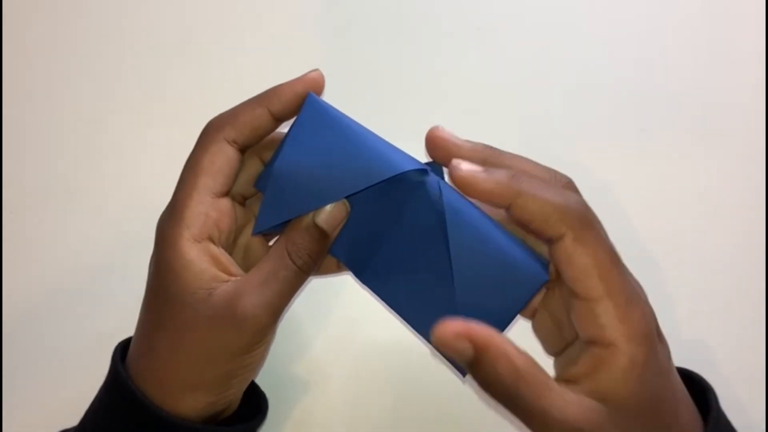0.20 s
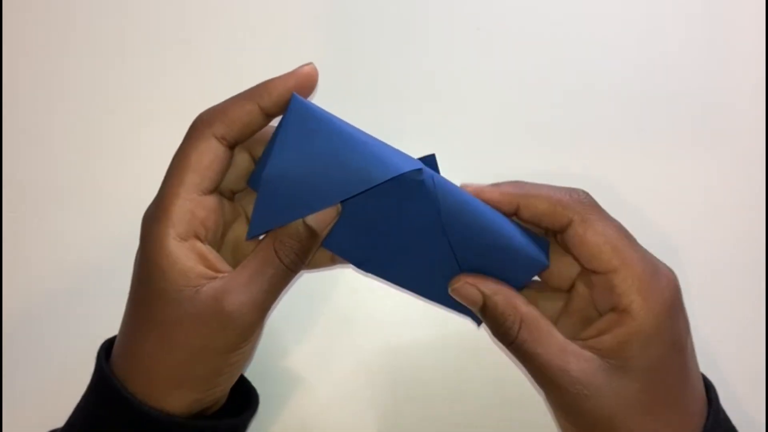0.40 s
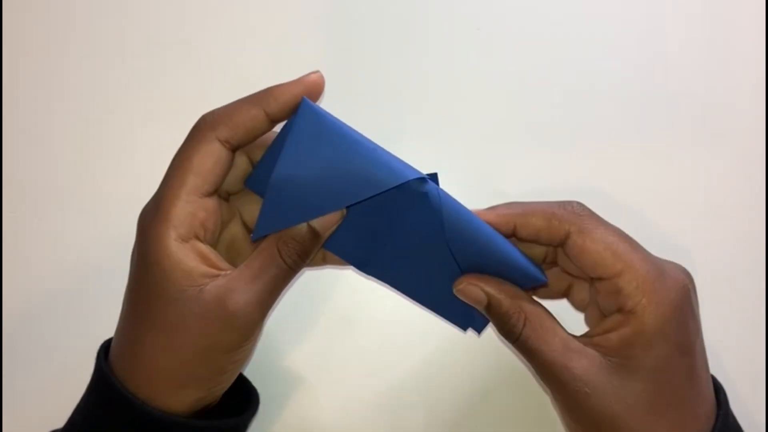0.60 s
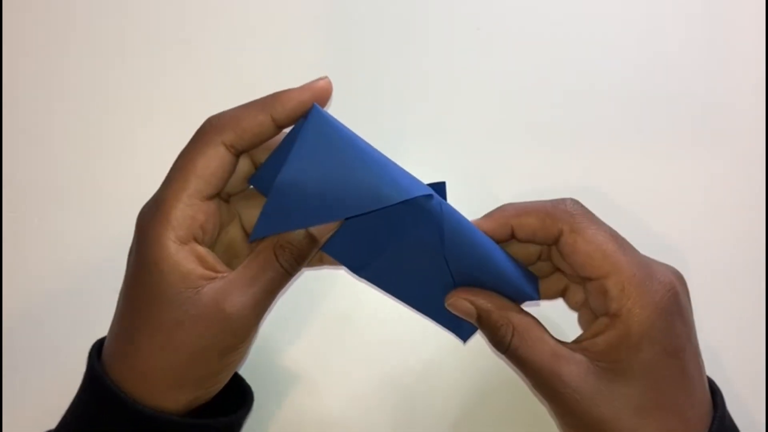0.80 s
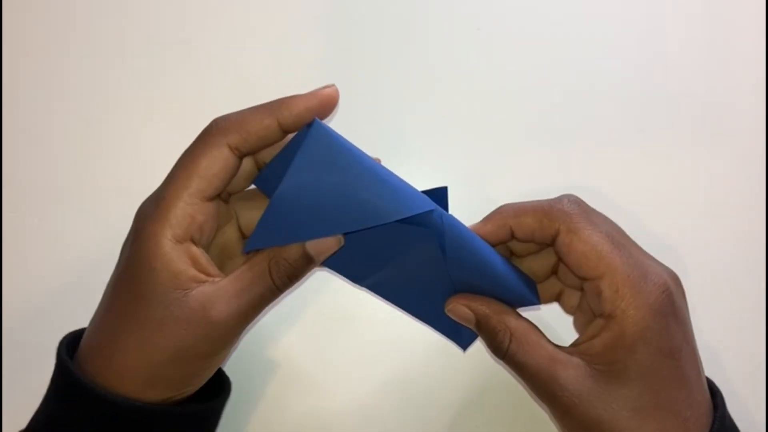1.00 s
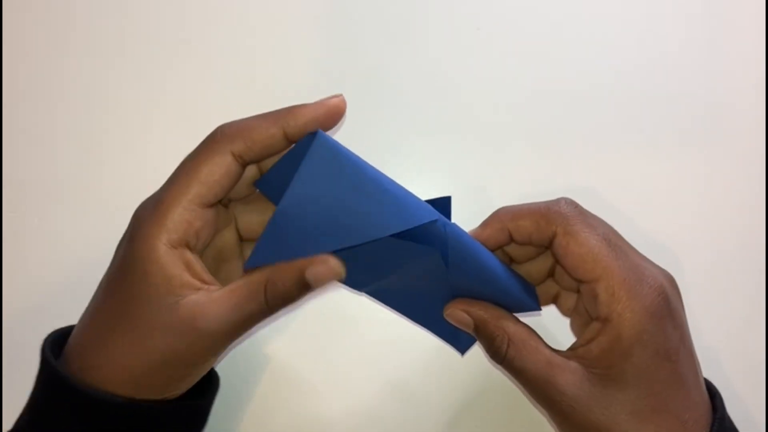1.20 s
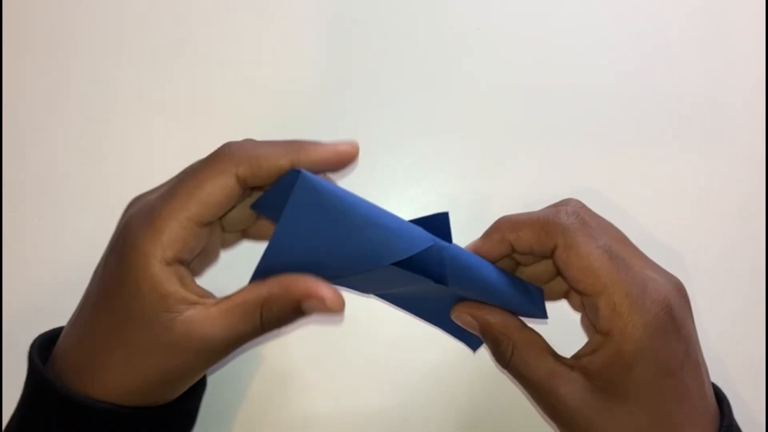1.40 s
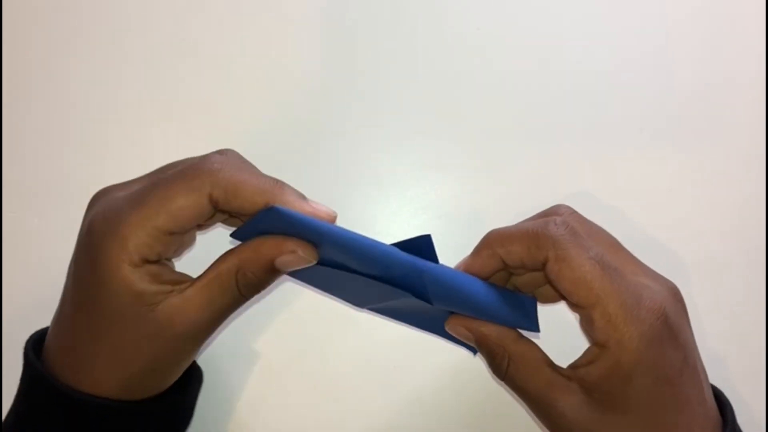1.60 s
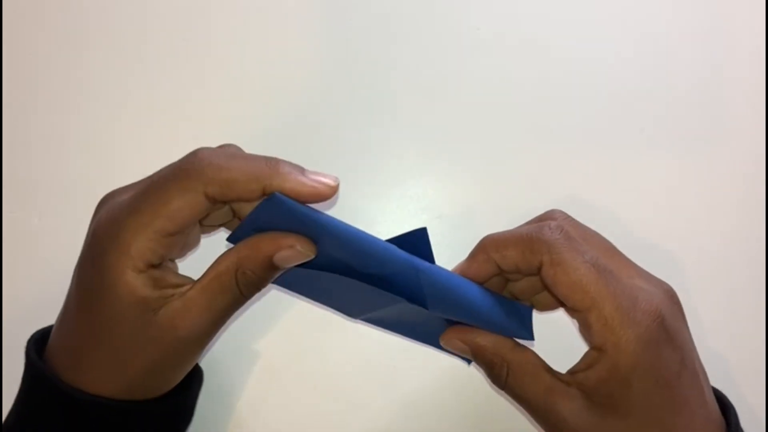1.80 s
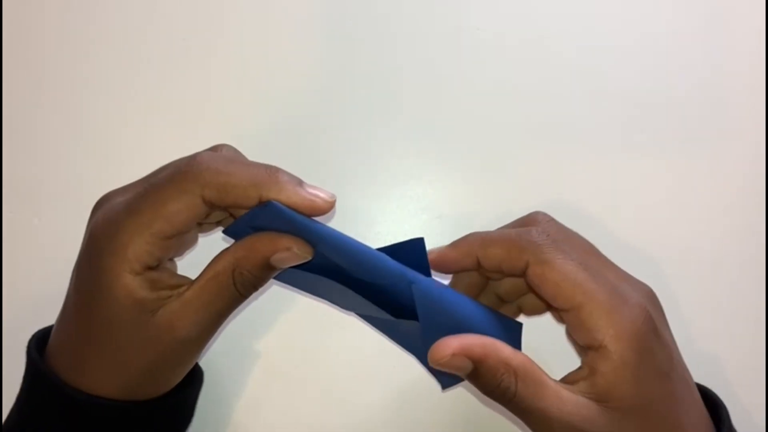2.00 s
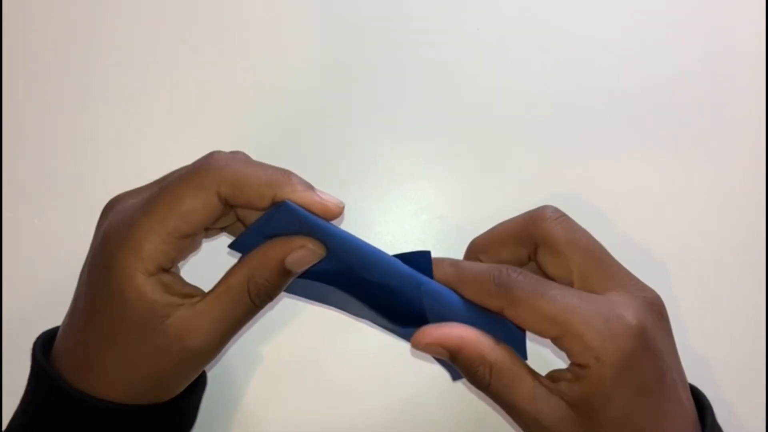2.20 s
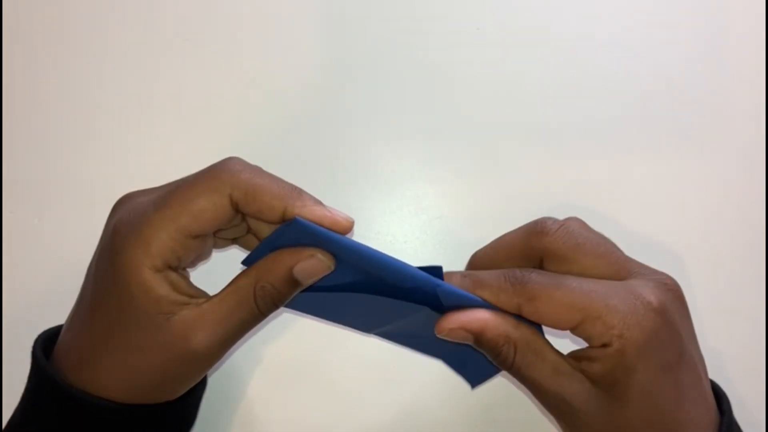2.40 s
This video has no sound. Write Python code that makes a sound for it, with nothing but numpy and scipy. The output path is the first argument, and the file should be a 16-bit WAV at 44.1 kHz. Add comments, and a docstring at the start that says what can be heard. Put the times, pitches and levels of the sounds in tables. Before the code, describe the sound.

Paper folding by hand: a sharp early snap, then soft grainy rustles and small crackling pops

```python
"""A short, bright paper scrape with a small snap comes first; a folded sheet is then bent and creased by hand.
Fingers and paper layers slide in grainy strokes, made from random grains and noise in three pitch ranges.
The stiff sheet buckles with snaps and dull pops: a brief sagging tone plus bursts of crackle and fizz.
Low thuds come from the hands and sheet. A small, quiet room answers with a short noise tail,
over a low rumble of shaped noise and a faint, wavering hum."""
import sys
import numpy as np
from scipy import signal
from scipy.fft import rfft, irfft, next_fast_len
from scipy.io import wavfile
from scipy.ndimage import uniform_filter1d, map_coordinates

SR = 44100
rng = np.random.default_rng(int(sys.argv[2]) if len(sys.argv) > 2 else 0)


def to_wav(s):
    """Save 16-bit WAV."""
    ch = np.atleast_2d(s).T  # columns
    pcm = np.round(np.clip(ch, -1, 1) * 32767)  # PCM
    wavfile.write(sys.argv[1], SR, pcm.astype(np.int16))


N = 112455  # length in samples


def amp(db):
    """Turn decibels into a gain."""
    return 10 ** (np.asarray(db) / 20)


def unit(x):
    """Scale a sound to an average (rms) level of 1."""
    return x / np.sqrt(np.mean(x ** 2) + 1e-20)


def along(points, hz):
    """Read a curve of (Hz, value) points, with pitch on a log axis."""
    f, v = np.transpose(points)
    return np.interp(np.log(hz + 1), np.log(f + 1), v)


def filtered(x, response):
    """Multiply the spectrum of x by a response that depends on frequency."""
    n = x.shape[-1]
    padded = next_fast_len(n + 4096)
    spectrum = rfft(x, padded) * response(np.fft.rfftfreq(padded, 1 / SR))
    return irfft(spectrum, padded)[..., :n]


def coloured(x, points):
    """Shape the spectrum of x, let it fall away beyond both ends, and set it to rms 1."""
    lowest_hz, highest_hz = points[0][0], points[-1][0]

    def response(hz):
        skirt = np.minimum(1, hz / lowest_hz) ** 2 / np.maximum(1, hz / highest_hz) ** 2
        return amp(along(points, hz)) * skirt

    return unit(filtered(x, response))


def wobble(rate):
    """Draw a smooth random curve through `rate` random points a second."""
    knots = rng.standard_normal(int(N * rate / SR) + 4)
    return map_coordinates(knots, [np.arange(N) * rate / SR])


# How far the sound spreads sideways, as the sheet radiates from its whole breadth.
# Each row: frequency in Hz, gain of the side signal in dB.
SIDE_SPREAD = [(500, -7), (1200, -12), (3000, -10), (8500, -17)]


def broad(near, spread):
    """Make left and right from the sound of the crease and of the sheet around it."""
    side = filtered(spread, lambda hz: amp(along(SIDE_SPREAD, hz)))
    return np.array([near + side, near - side])


# How the two sides differ in loudness. Each row: frequency in Hz, left minus right in dB.
SIDE_BALANCE = [(200, -1), (700, -5.5), (1200, -5), (2800, -7), (4500, 0), (6000, 0), (11000, 0)]


def balanced(x):
    """Give each side half of the level difference, in opposite directions."""
    halves = np.array([[.5], [-.5]])
    return filtered(x, lambda hz: amp(along(SIDE_BALANCE, hz) * halves))


PATCH_DB = 3.3  # typical size of the gain changes


def patchy(x):
    """Vary the gain in random patches of time and pitch, as the colour shifts with the sheet's shape."""
    z = signal.stft(x, nperseg=512)[2]
    field = uniform_filter1d(rng.standard_normal(z.shape), size=5, axis=0)  # smooth across pitch
    field = uniform_filter1d(field, size=10, axis=1)  # smooth over time
    return signal.istft(z * amp(PATCH_DB * unit(field)), nperseg=512)[1][:N]


# The sliding strokes. Each row: start in seconds, end in seconds, rise in seconds per 20 dB,
# fall in seconds per 20 dB, then body, rustle and hiss levels in dB before the trims below,
# and the swell from start to end in dB.
STROKES = [ (0, .01, .01, .04, -47, -51, -44, -6), (.035, .055, .04, .03, -62, -60, -57, 5),
           (.061, .068, .008, .012, -56, -49, -44, -3), (.075, .1, .03, .09, -72, -63, -60, -6),
           (.172, .19, .03, .02, -62, -60, -62, 5), (.198, .295, .022, .07, -54, -47.5, -48, 0),
           (.32, .36, .03, .05, -61, -50, -52, -2), (.375, .4, .035, .05, -55, -48, -42, 1),
           (.42, .52, .04, .04, -62, -53.5, -52.5, -4), (.607, .668, .008, .075, -62, -53, -50, 1),
           (.74, .82, .04, .03, -72, -66, -66, 5), (.845, .925, .12, .05, -62, -58.5, -55.5, 2),
           (1.047, 1.095, .025, .05, -66, -64, -76, -3), (1.125, 1.135, .025, .02, -70, -60, -58, 0),
           (1.172, 1.22, .025, .03, -55, -50, -45.5, 0), (1.25, 1.29, .03, .04, -73, -71, -69, 0),
           (1.308, 1.328, .012, .03, -63, -59, -56, -1), (1.331, 1.35, .004, .04, -57, -54, -48, 0),
           (1.37, 1.425, .04, .1, -65, -54.5, -47, 2), (1.475, 1.545, .04, .035, -58, -60, -56, -1),
           (1.552, 1.58, .005, .06, -60, -66, -66, -7), (1.693, 1.735, .011, .025, -92, -60, -52, 0),
           (1.772, 1.795, .004, .03, -70, -66, -64, 3), (1.803, 1.822, .008, .05, -54, -57, -58, 0),
           (1.825, 1.885, .04, .033, -70, -57, -50, -1), (2.04, 2.08, .03, .04, -92, -73, -72, 2),
           (2.1, 2.17, .02, .05, -74, -63, -57, 6), (2.185, 2.25, .02, .03, -60, -59, -60, 0),
           (2.262, 2.305, .01, .045, -55, -54, -59, -5), (2.368, 2.395, .004, .04, -67, -63, -56, 0),
           (2.409, 2.432, .01, .04, -54, -57, -50, 0), (2.44, 2.487, .04, .06, -65, -57.5, -49.5, 0),
           (2.535, 2.55, .02, .05, -60, -62, -68, -2)]
# The low, middle and high sound of sliding paper. Each row: frequency in Hz, relative strength in dB per Hz.
BODY = [(150, -26), (400, -16), (650, -7), (1000, 0), (1450, -1.5), (1850, -8), (2600, -30)]
RUSTLE = [(1200, -32), (1850, -6), (2300, -1.5), (2900, 0), (3500, -.5), (4400, -3), (5200, -24)]
HISS = [(3500, -30), (4500, -2), (5100, -11), (5900, -13), (6500, -2), (7600, -.5), (8500, 2), (9500, -3),
        (10500, -4.5), (11700, -11)]
BODY_DB, RUSTLE_DB, HISS_DB = -2.5, -1.2, -.7  # level trims
BODY_GRAIN, RUSTLE_GRAIN, HISS_GRAIN = .7, .5, .12  # share of the power in grains, the rest is smooth noise
GRAINS_PER_S, GRAIN_SPREAD_DB = 850, 4  # fibres catching and letting go
JUDDER_KNOTS_PER_S, JUDDER_DB = 50, 1.2  # unsteady finger pressure


def sliding():
    """Drive the paper's body, rustle and hiss with the same catching fibres in every stroke."""
    t = np.arange(N) / SR
    power = np.zeros((3, N))
    for start, end, rise, fall, body_db, rustle_db, hiss_db, swell_db in STROKES:
        edges_db = -20 * (np.maximum(start - t, 0) / rise + np.maximum(t - end, 0) / fall)
        progress = np.clip((t - start) / (end - start), 0, 1)
        shape_db = edges_db + swell_db * (progress - .5)
        power += amp(shape_db + np.array([[body_db], [rustle_db], [hiss_db]])) ** 2

    sizes = amp(GRAIN_SPREAD_DB * np.clip(rng.standard_normal(N), -2, 2))
    signs = rng.choice([-1, 1], N)
    catches = rng.random(N) < GRAINS_PER_S / SR
    grains = unit(sizes * signs * catches)

    registers = [(BODY, BODY_DB, BODY_GRAIN), (RUSTLE, RUSTLE_DB, RUSTLE_GRAIN), (HISS, HISS_DB, HISS_GRAIN)]
    out = np.zeros((2, N))
    for register_power, (colour, db, share) in zip(power, registers):
        friction = np.sqrt(share) * grains + np.sqrt(1 - share) * rng.standard_normal(N)
        stereo = broad(patchy(friction), rng.standard_normal(N))
        out += amp(db) * np.sqrt(register_power) * coloured(stereo, colour)
    out *= amp(JUDDER_DB * wobble(JUDDER_KNOTS_PER_S))
    return balanced(out)


# The buckles of the sheet. Each row: start in seconds, rise time scale in ms, flap pitch in Hz, flap level in dB,
# crack pitch in Hz, crack level in dB, fizz level in dB (all levels before the trims below),
# and left minus right in dB for flap and crack.
SNAPS = [(0.0004, 1.6, 1300, -41.5, 3150, -44.5, -38.0, -1),
         (0.0603, 1.2, 1700, -57, 3250, -42.5, -36.0, -1),
         (0.0643, 1.2, 1400, -49.5, 3250, -41.5, -40.0, -1), (0.1894, 0.6, 1300, -34, 2950, -33.5, -50, -4),
         (0.1992, 0.6, 1200, -45.5, 2450, -45.5, -43.0, -2), (0.211, 2, 900, -48, 2500, -46, -54, -2),
         (0.2262, 0.8, 1500, -42, 2800, -33, -30, -2), (0.2278, 0.9, 1600, -23.5, 2700, -20.5, -15.5, -4),
         (0.2352, 2, 1500, -40, 3400, -33, -38, -4), (0.2772, 0.7, 1200, -41, 3200, -25, -28.0, -6),
         (0.3784, 0.8, 1200, -45.5, 3100, -38.5, -41.0, -3),
         (0.3855, 0.6, 1300, -43.5, 3100, -37, -36.0, -1),
         (0.3944, 0.8, 1200, -52.5, 3700, -45.5, -39.0, -1),
         (0.6483, 0.7, 1000, -48.5, 2950, -50.5, -53.0, -3),
         (0.6575, 0.7, 1400, -43, 2450, -36.5, -36.0, 0), (0.6643, 1.5, 1350, -43, 2600, -45.5, -45.0, -1),
         (0.6898, 0.6, 1400, -56.5, 2900, -53.5, -45.0, -3), (0.7135, 0.6, 1400, -58, 2700, -55, -58, -2),
         (0.8228, 0.6, 1400, -55.5, 2800, -45.5, -45.0, -2),
         (0.8762, 0.7, 1100, -51.5, 3000, -53.5, -56.0, -3),
         (1.0479, 0.5, 1300, -49.5, 2550, -41.5, -65.0, -7),
         (1.0923, 0.7, 1400, -57.5, 2250, -61.5, -78.0, -2), (1.165, 0.8, 1100, -47.5, 2700, -49, -52, -3),
         (1.1738, 0.7, 1200, -47.5, 2450, -37.5, -39, -3), (1.2138, 0.6, 1200, -48, 3500, -42, -40, -2),
         (1.465, 0.8, 1000, -49, 2600, -60, -66, -4), (1.4932, 0.7, 800, -45.5, 3200, -50.5, -50.0, -5),
         (1.5201, 0.6, 1100, -36.5, 2850, -45.5, -52.0, -3),
         (1.5457, 0.6, 800, -36.0, 2200, -35.5, -66, -9), (1.5505, 2, 750, -47, 2150, -45, -70, -6),
         (1.7712, 0.7, 1100, -66, 3500, -62, -64, -3), (1.8007, 0.7, 900, -51.5, 3300, -55.5, -57.0, -3),
         (1.808, 2, 850, -49, 2600, -64, -68, -3), (1.8165, 1.2, 850, -51, 2600, -62, -66, -3),
         (2.1799, 1.4, 1400, -46, 2650, -39, -50.0, -6), (2.2199, 0.7, 1250, -40, 3100, -37.5, -39, -4),
         (2.222, 0.6, 1150, -39, 2900, -46, -52, -4), (2.2291, 0.7, 1100, -43.5, 3050, -45.5, -57.0, -7),
         (2.2559, 0.9, 1300, -31.5, 3400, -26, -28.5, -4), (2.2635, 1.6, 1400, -44, 3600, -41, -50, -4),
         (2.2745, 2, 1300, -47, 3500, -45, -58, -4), (2.2913, 0.7, 1300, -47.5, 2800, -49.5, -56.0, -2),
         (2.3025, 1.2, 1400, -48, 2600, -50, -62, -3), (2.4079, 0.7, 1100, -44.5, 3400, -50.5, -44.0, -1),
         (2.4304, 0.6, 1100, -48.5, 3350, -45.5, -44.0, -3), (2.536, 0.8, 850, -47, 2350, -48.5, -62.0, -6)]
# The tone of a crack. Each row: multiple of the crack pitch, relative strength in dB per Hz.
CRACK = [(.15, -34), (.35, -15), (.58, -6.5), (.8, -1.5), (1, 0), (1.22, -1.5), (1.42, -15), (1.9, -36)]
# The bright fizz on top. Each row: frequency in Hz, relative strength in dB per Hz.
FIZZ = [(3000, -25), (4500, -4), (6400, -1), (7600, -3), (8500, 5), (9300, -4), (10500, -5), (11700, -11)]
FLAP_DB, CRACK_DB, FIZZ_DB = -2.6, -.6, 1.2  # level trims
FLAP_CYCLES, FLAP_SAG = 1.0, .12  # decay time in cycles; share by which the pitch drops
FLAP_LOW_HZ = 500  # a small panel radiates little below this


def buckling():
    """Flip a panel over with a few sagging cycles while its fibres crack in a short, dense burst."""
    size = 1024  # samples in one snap
    t = np.arange(size) / SR
    over_2_ms = np.sqrt(.002 * SR / size)  # a level counts as if the energy lay within 2 ms
    radiation = signal.butter(2, FLAP_LOW_HZ, "high", fs=SR)
    out = np.zeros((2, N + size))
    for start, rise_ms, flap_hz, flap_db, crack_hz, crack_db, fizz_db, pan_db in SNAPS:
        u = t / (rise_ms / 1000)
        burst = u ** 1.3 * np.exp(-1.15 * u)
        ring = np.exp(-t * flap_hz / FLAP_CYCLES)
        sagging_hz = flap_hz * (1 + FLAP_SAG * (ring - .5))
        phase = 2 * np.pi * np.cumsum(sagging_hz) / SR
        swing = (1 - np.exp(-u ** 2)) * ring * np.sin(phase)
        flap = unit(signal.lfilter(*radiation, swing))

        crack_clicks = burst * rng.choice([-1, 1], (2, size))
        crack = coloured(broad(*crack_clicks), np.array(CRACK) * [crack_hz, 1])
        fizz_clicks = burst * rng.choice([-1, 1], (2, size))
        fizz = coloured(broad(*fizz_clicks), FIZZ)

        low = amp(flap_db + FLAP_DB) * flap + amp(crack_db + CRACK_DB) * crack
        panned = low * amp([[pan_db / 2], [-pan_db / 2]])
        i = max(0, round(start * SR))
        out[:, i:i + size] += over_2_ms * (panned + amp(fizz_db + FIZZ_DB) * fizz)
    return out[:, :N]


# How long the room rings. Each row: frequency in Hz, seconds to fall by 60 dB.
ROOM_T60 = [(200, .3), (700, .23), (1300, .25), (3000, .27), (10000, .2)]
# How strongly the room answers. Each row: frequency in Hz, gain in dB.
ROOM_SEND = [(200, -5), (500, -7), (1000, -11), (2000, -11), (3200, -10.5), (5000, -15.5), (10000, -17)]
# How alike left and right are in the answer. Each row: frequency in Hz, likeness (1 same, 0 unrelated).
ROOM_ALIKE = [(200, 0), (1000, -.1), (3000, -.1), (6000, .2), (9000, .8)]
EARLY_S, EARLY_DB = .012, -6.5  # scatter from table and hands: decay in seconds, level against the tail


def room(x):
    """Answer with quick scatter from the table and a short tail, more diffuse in the bass."""
    hz, t, z = signal.stft(rng.standard_normal((2, SR // 2)), SR, nperseg=256)
    decay = amp(-60 * t / along(ROOM_T60, hz)[:, None])
    tail = signal.istft(z * decay, SR, nperseg=256)[1]
    t = np.arange(tail.shape[1]) / SR
    early = rng.standard_normal(tail.shape) * np.exp(-t / EARLY_S)
    answer = (unit(tail) + amp(EARLY_DB) * unit(early)) / np.sqrt(len(t))
    delayed = np.pad(answer, ((0, 0), (SR // 500, 0)))  # wait 2 ms
    wet = signal.fftconvolve(x.mean(0)[None], delayed, axes=1)[:, :N]

    def mid_side_gain(f):
        turn = np.arccos(np.clip(along(ROOM_ALIKE, f), -1, 1)) / 2
        return amp(along(ROOM_SEND, f)) * [np.cos(turn), np.sin(turn)]

    mid, side = filtered(wet, mid_side_gain)
    return balanced(np.array([mid + side, mid - side]))


# The colour of the room's rumble. Each row: frequency in Hz, relative strength in dB per Hz.
AIR = [(20, -26), (32, -11), (42, 3), (55, -3), (75, -10), (120, -11), (200, -12), (310, -17), (400, -29),
       (520, -41), (750, -44), (1500, -37), (3000, -38), (5500, -43), (8500, -37), (11500, -48)]
AIR_DB, AIR_SIDE_DB = -67.5, -6  # level of the middle; side level against the middle
HUM_HZ, HUM_DB = 215, -76
# Low thuds as the hands shift and the whole sheet jumps.
# Each row: moment of the peak in seconds, width in seconds, pitch in Hz, level at the peak in dB.
BUMPS = [(.085, .018, 265, -62), (.2, .02, 140, -61), (.2295, .002, 640, -43), (.24, .015, 480, -59),
         (.265, .04, 120, -61), (.279, .002, 620, -52), (.42, .04, 140, -68), (1.552, .012, 300, -66),
         (1.812, .012, 280, -67), (2.095, .033, 105, -60)]
# The tone of a thud. Each row: multiple of its pitch, relative strength in dB per Hz.
BUMP = [(.5, -14), (1, 0), (1.3, -7), (1.8, -30)]


def background():
    """Add low room rumble from noise, a faint wavering hum, and noise thuds that swell and fade."""
    t = np.arange(N) / SR
    air_gains = amp([[AIR_DB], [AIR_DB + AIR_SIDE_DB]])
    mid, side = coloured(rng.standard_normal((2, N)), AIR) * air_gains
    hum = unit(np.sin(2 * np.pi * HUM_HZ * t + .5 * wobble(5)))
    mid = mid + amp(HUM_DB) * hum
    for peak, width, hz, db in BUMPS:
        press = amp(db) * np.exp(-.5 * ((t - peak) / width) ** 2)
        mid = mid + press * coloured(rng.standard_normal(N), np.array(BUMP) * [hz, 1])
    return np.array([mid + side, mid - side])


# How far the left side runs ahead. Each row: frequency in Hz, lead in radians.
LEFT_LEAD = [(100, 0), (700, .5), (1500, .5), (3000, 1.15), (4100, 1.6), (4600, 2.7), (5200, 3.1),
             (5900, 3.3), (6500, 4), (7200, 5.6), (7900, 6.28), (9400, 6.28), (10000, 7.3), (10800, 9.2)]


def scene():
    """Let the paper and its room reach the left side slightly earlier than the right."""
    paper = sliding() + buckling()
    halves = np.array([[.5], [-.5]])
    heard = filtered(paper + room(paper), lambda hz: np.exp(1j * along(LEFT_LEAD, hz) * halves))
    return heard + background()


TOP_HZ = 11700  # band limit of the recorder


def record(dry):
    """Cut very steeply above the recorder's band limit."""
    return filtered(dry, lambda hz: 1 / np.sqrt(1 + (hz / TOP_HZ) ** 120))


dry = scene()
out = record(dry)
to_wav(out)
```